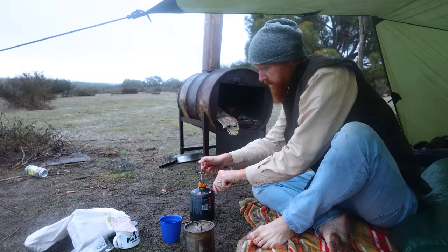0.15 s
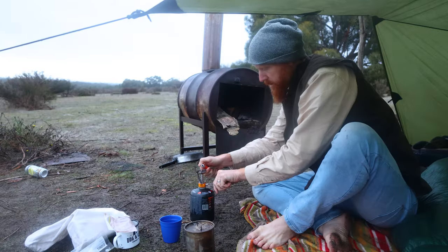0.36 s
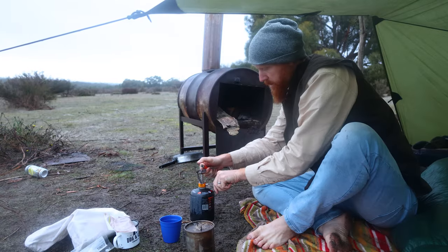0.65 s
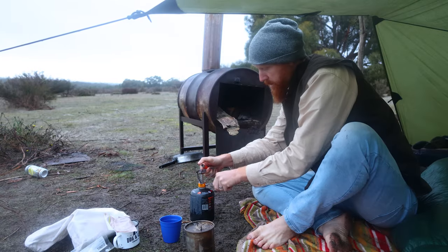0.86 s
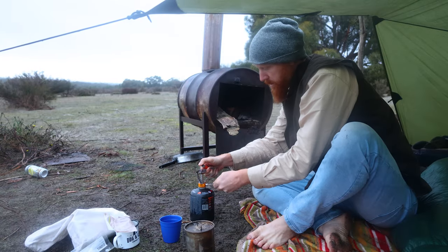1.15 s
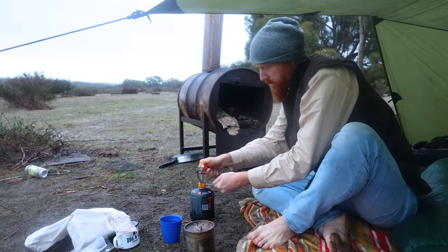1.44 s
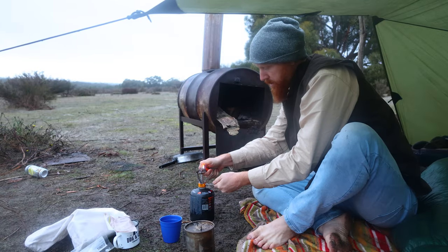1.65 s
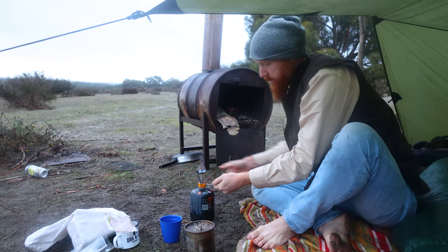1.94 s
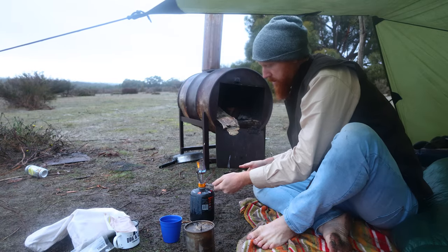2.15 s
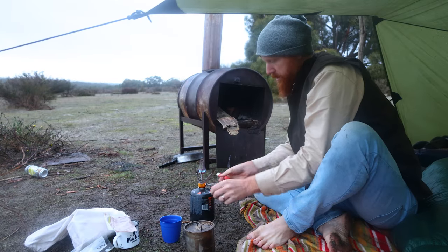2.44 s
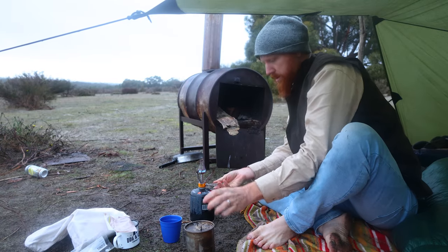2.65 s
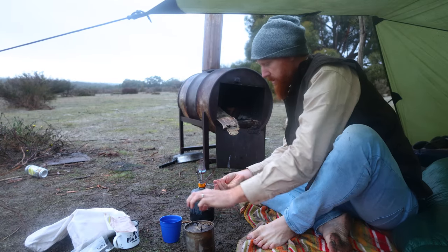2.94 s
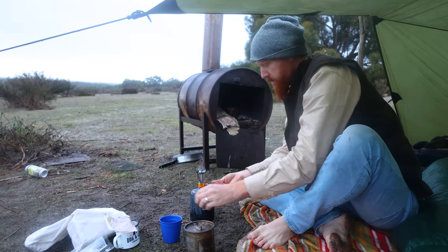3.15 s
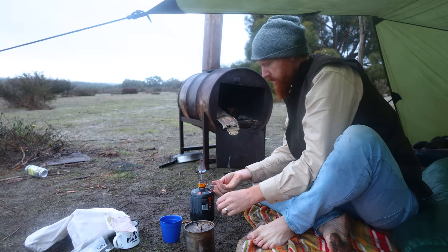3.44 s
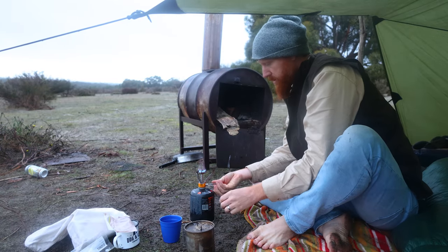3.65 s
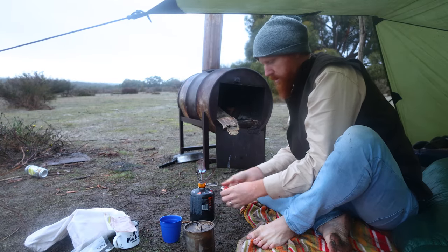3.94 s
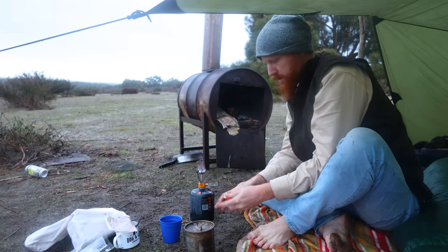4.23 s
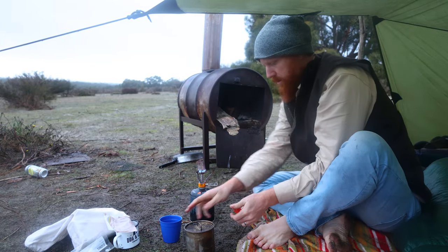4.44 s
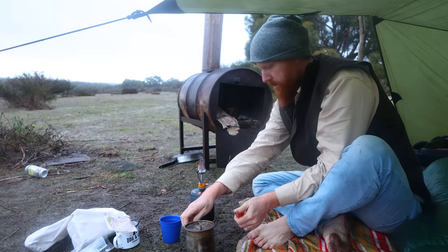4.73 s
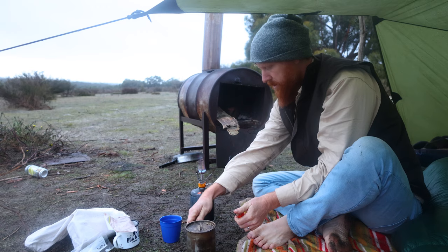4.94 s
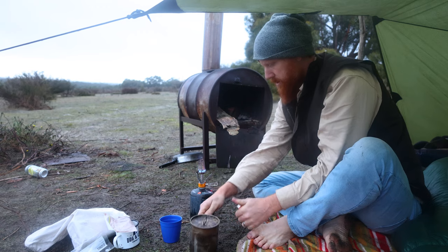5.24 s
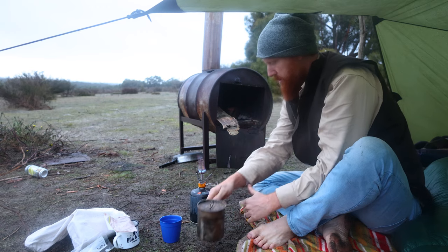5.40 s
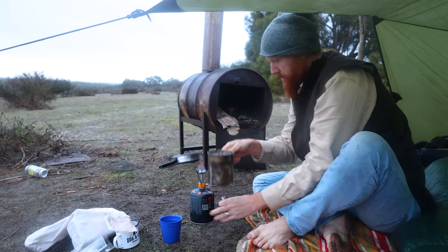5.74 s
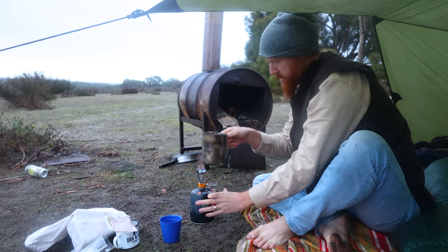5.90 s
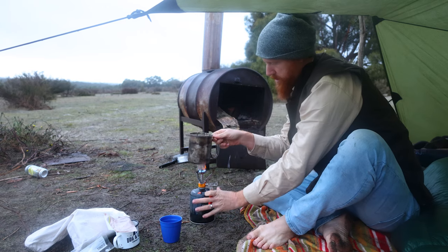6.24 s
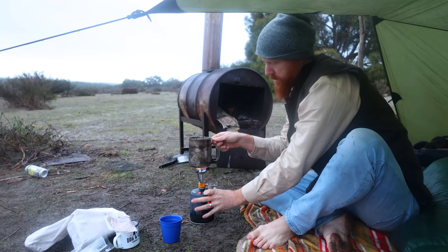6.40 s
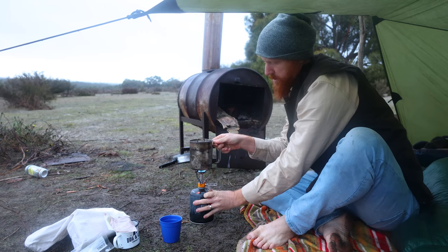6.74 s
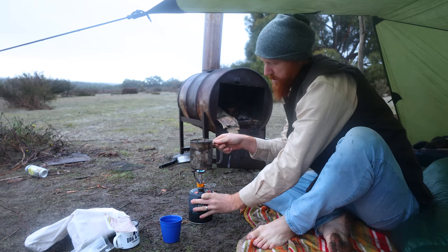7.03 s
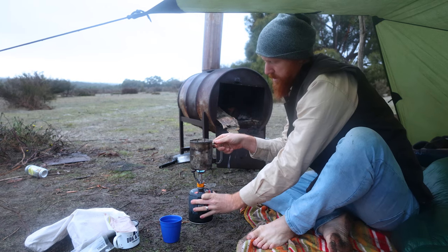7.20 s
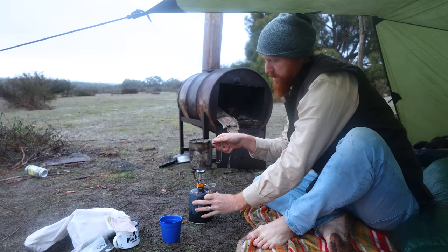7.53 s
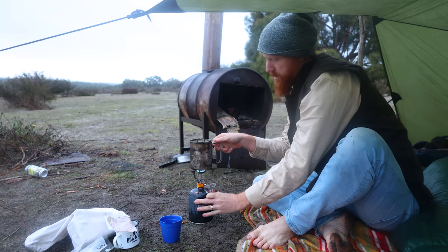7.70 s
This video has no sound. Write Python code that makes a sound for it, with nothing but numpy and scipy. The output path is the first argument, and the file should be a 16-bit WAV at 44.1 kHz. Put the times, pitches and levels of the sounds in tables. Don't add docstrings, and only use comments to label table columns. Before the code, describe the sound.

Close outdoor sound of lighting a camping stove: two gritty flint clicks, a faint gas puff, a dull whump, then continuous burner roar and jet hiss, stronger after a few seconds. Later a thin metal pot and lid tick, clank and drag on the prongs. Small birds chirp near and far over soft open air, and low wind thuds hit the microphone near the start and end. Nearly mono, dry, with faint hiss.

```python
import sys
import numpy as np
from scipy import signal
from scipy.fft import rfft, irfft
from scipy.io import wavfile
from scipy.ndimage import uniform_filter1d

SR = 44100
rng = np.random.default_rng(int(sys.argv[2]) if len(sys.argv) > 2 else 0)


def ratio_of_db(decibels):
    return 10 ** (np.asarray(decibels, float) / 20)


def master(y):
    cut = np.clip(np.atleast_2d(y).T, -1, 1)
    pcm = np.round(cut * 32767)
    wavfile.write(sys.argv[1], SR, pcm.astype(np.int16))


N = 346626
T = np.arange(N) / SR
HZ = np.fft.rfftfreq(N, 1 / SR)

# (frequency [Hz], level [dB per Hz])
ROAR_COLOUR = [(24, -26), (40, -21), (64, -6), (141, -3.5), (172, -0.5), (230, -0.5), (281, -5),
               (366, -4.5), (523, -10), (622, -17.5), (691, -12), (854, -20), (950, -31.5), (1240, -69),
               (2090, -120)]
# (frequency [Hz], level [dB per Hz])
JET_COLOUR = [(500, -29), (850, -10.5), (1010, 1), (1440, 2), (1800, -3), (2170, -14), (2440, -11),
              (2740, -8), (3270, -9.5), (4290, -16), (4710, -13.5), (5550, -19.5), (9400, -25),
              (10900, -35), (14000, -28)]
# (time [s], opening [0 = low flame, 1 = high flame])
VALVE = [(1.83, -0.16), (1.98, -0.017), (2.64, 0.049), (2.85, 0.11), (3.05, -0.24), (3.3, -0.15),
         (3.51, 0.12), (3.63, 0.78), (3.8, 1), (5.3, 0.97), (5.69, 0.93), (6.0, 0.99), (7.4, 0.87),
         (7.86, 0.98)]
# (low flame [dB], gain of the open valve [dB], change under the pot [dB])
BURNER = [
    (-42, 3, 3),
    (-57.5, 11, -3.5),
    (-58.5, 7, -3),
]
# (frequency [Hz], width [Hz], level [dB])
NOZZLE_TONES = [(4590, 180, -13.5), (9000, 500, -18.5)]
POT_COMES_S, POT_OVER_S = 5.8, 6.9
IGNITE_S, IGNITE_DB, IGNITE_WIDTH_S = 1.8195, -14, 0.0011

# (time of peak [s], level [dB], rise [s], fall [s], treble factor [1 = even])
FLINT = [(.384, -29, .005, .004, 1.6), (.367, -40, .002, .012, 1.1), (.398, -38, .0003, .0005, 3),
         (.394, -38, .0003, .0005, 2.5), (1.4585, -29, .0015, .0015, 3), (1.453, -32, .002, .002, 1),
         (1.4435, -38, .001, .004, .1), (1.438, -44, .001, .002, .1), (1.44, -50, .03, .02, .15),
         (1.4635, -32, .001, .003, 1.1), (1.4745, -38, .0005, .002, .6), (1.497, -46, .0004, .001, 2),
         (1.533, -48, .0003, .0008, 1.8), (1.5405, -54, .001, .001, 1.5), (1.5425, -44, .0003, .001, 1.8)]
# (frequency [Hz], width [Hz], level [dB])
LIGHTER_CASE = [(3350, 790, 8), (1510, 690, -8), (6000, 1700, -2.5), (8700, 4500, -4), (12700, 6300, -5.5)]
# (frequency [Hz], level [dB], width [s])
SNAP = [(3250, -10.5, .001), (9150, -11, 0.0007), (6100, -16, 0.0004), (4400, -20, .0006),
        (7600, -19, .0005), (14500, -17, .0004)]
SNAP_S = 1.4587
# (time of peak [s], level [dB], rise [s], fall [s])
PUFFS = [
    (1.2, -51, .015, .03),
    (1.24, -51, .025, .03),
    (2.74, -62, .02, .03),
    (1.96, -60, .01, .01),
]

# (time [s], peak level [dB], treble minus peak [dB], ring frequency [Hz], time to fall 60 dB [s])
TICKS = [(0.2005, -47, -14, 3500, .025), (0.2124, -44, -14, 3300, .015), (0.2327, -47, -26, 3500, .04),
         (0.7094, -45, -12, 4900, .02), (0.737, -39.5, -27, 3400, 0.022), (2.2497, -52.5, 5.5, 4580, .02),
         (4.3902, -30, -22, 4500, .022), (4.3904, -32.5, -32, 2300, .025),
         (4.7728, -28.5, -6.5, 3050, 0.066), (4.9297, -27, -1.5, 2900, 0.053),
         (5.887, -30, -9.5, 3470, 0.028), (6.39, -51, 4, 4590, .02), (6.501, -36, -24, 2400, .015),
         (6.6693, -34, -2, 5600, 0.04), (6.797, -50, 1, 3040, .02), (6.9321, -42, 0, 4240, 0.038),
         (6.982, -40, -3, 3140, .025), (6.995, -35.5, -6, 3020, 0.05), (7.1935, -44, -3.5, 5540, .02),
         (7.5358, -46, -14, 2300, .02), (7.635, -44, -20, 2800, 0.074), (7.7478, -39.5, -21, 2230, .025),
         (7.852, -41, -19, 2200, .025)]
# (frequency [Hz], level [dB], time to fall 60 dB [s])
TIN = [(2170, -8, 0.15), (3050, 0, 0.08), (5100, -0.5, 0.12), (6010, 3, 0.1), (7510, 2.5, 0.12),
       (9200, -1, 0.08), (10630, -4, 0.078), (11500, -3.5, 0.055), (13200, 0, .05)]
RATTLE_FADE_BEND = 1.32
# (time of peak [s], level [dB], rise [s], fall [s])
SCRAPE = [
    (6.93, -54, .015, .012),
    (6.99, -48, 0.022, 0.029),
]
# (time [s], frequency [Hz], level [dB],
# time to fall 60 dB [s])
KNOCKS = [(.397, 143.6, -32, 0.011), (1.809, 189, -38, 0.12), (.68, 673.9, -49, 0.028),
          (.72, 510, -51, .04), (6.975, 780, -34, .04), (4.937, 410, -26.5, 0.061), (4.94, 2240, -42, 0.19),
          (6.67, 990, -38, 0.033), (6.935, 950, -35, 0.044), (6.985, 1045, -37, .05),
          (6.997, 1055, -33, 0.087)]

# (time of peak [s], level [dB], rise [s], fall [s])
GUSTS = [(1.9, -50, .02, .03), (2.73, -60, .5, .12), (3.66, -62, .07, .3), (4.39, -63, .1, 1),
         (5.1, -54, .15, .3), (5.77, -47, 0.27, .08), (5.99, -40.5, 0.083, 0.17), (6.7, -30, .07, 0.072),
         (6.99, -34.5, .2, .45), (7.86, -42, 0.16, 0.11)]
# (time of peak [s], level [dB], rise [s], fall [s])
OPENING_GUST = (0.2, -34.5, 0.8, .08)
# (frequency [Hz], level [dB per Hz])
LEAF_COLOUR = [(71, -45), (120, -12), (245, -15.5), (510, -2), (728, -10), (1230, -9), (1440, -14),
               (1680, -8), (5500, -17.5), (9100, -53), (15400, -120)]
LEAF_DB = -52.5

# (time [s], frequency [Hz], level [dB])
SONGS = [
    [(3.416, 5600, -58), (3.43, 5500, -61), (3.46, 5820, -54), (3.5, 4570, -47), (3.508, 4505, -48),
     (3.52, 4750, -53), (3.542, 4650, -61)],
    [(3.87, 4100, -57), (3.9, 3730, -52), (3.925, 3360, -51), (3.97, 3050, -51), (3.985, 3150, -60)],
    [(4.21, 3800, -58), (4.245, 3450, -52), (4.28, 3340, -50), (4.3, 3090, -54), (4.315, 3080, -56)],
    [(4.315, 3420, -60), (4.345, 3230, -61), (4.4, 3350, -60), (4.435, 3700, -62)],
    [(4.864, 5400, -53), (4.878, 5250, -53), (4.9, 5100, -41), (4.915, 5100, -50), (4.924, 5030, -45)],
    [(5.378, 3700, -59), (5.395, 3850, -57), (5.44, 3750, -61), (5.49, 3540, -55)],
    [(5.757, 5700, -58), (5.775, 5500, -59), (5.8, 5490, -54), (5.83, 4780, -55), (5.865, 4650, -60)],
    [(6.464, 3870, -58), (6.472, 4700, -52), (6.49, 4030, -46.5), (6.51, 3810, -48), (6.537, 3730, -56)],
    [(7.195, 5600, -56), (7.21, 5560, -55), (7.232, 5400, -57), (7.25, 4950, -57), (7.285, 4800, -61)],
    [(7.63, 3140, -59), (7.68, 3400, -59), (7.73, 3610, -62), (7.81, 4050, -60)],
    [(7.81, 4600, -53), (7.828, 4080, -49), (7.86, 3780, -46)],
]
# (time [s], length [s], from [Hz], to [Hz], level [dB])
FALLS = [(.81, .025, 6300, 4750, -72), (1.985, .04, 3450, 3050, -54), (2.05, .025, 3865, 3080, -55),
         (2.07, .03, 3150, 2650, -56), (2.12, .115, 2950, 2740, -54.5), (2.15, .045, 4150, 3550, -60),
         (2.436, .04, 3750, 3400, -55), (2.97, .025, 3600, 2900, -59), (3.075, .03, 3900, 3000, -60),
         (2.415, .02, 3500, 2600, -60), (7.23, .015, 4050, 3700, -56), (5.248, .02, 2420, 2300, -51),
         (7.8, .03, 3200, 2700, -56), (7.42, .025, 3500, 3100, -57), (7.355, .03, 3400, 2700, -54)]
# (time [s], length [s], from [Hz], to [Hz], level [dB])
RISES = [(.45, .05, 2440, 2600, -65), (.68, .055, 4800, 4900, -61), (2.06, .1, 4900, 5500, -70),
         (2.4, .043, 2450, 2590, -53), (2.478, .04, 3550, 3990, -59), (3.05, .04, 2650, 3050, -59),
         (3.19, .035, 3300, 4050, -60), (3.23, .035, 3300, 3650, -57), (3.32, .04, 3500, 4200, -62),
         (3.33, .07, 3150, 3700, -61), (3.54, .16, 3350, 4100, -59), (3.84, .05, 2377, 2523, -57),
         (5.315, .03, 2460, 2560, -50), (7.445, .035, 2820, 3300, -52), (7.325, .03, 3380, 3520, -56)]
# (time [s], length [s], from [Hz], to [Hz], level [dB])
DIVES = [
    (5.805, .065, 4000, 3600, -60),
    (6.415, 0.038, 5300, 5080, -52),
]
# (time [s], length [s], frequency [Hz], level [dB])
PIPS = [(.27, .07, 2430, -64), (.33, .035, 2965, -60), (.49, .04, 4010, -67), (.89, .05, 4870, -66),
        (1.9, .02, 2295, -60), (1.94, .045, 3340, -55), (1.97, .03, 2340, -57), (2.075, .03, 3330, -57),
        (2.08, .07, 4140, -59), (2.325, .025, 3580, -57), (2.34, .025, 2343, -53), (2.59, .02, 3400, -59),
        (2.685, .015, 3050, -59), (2.81, .035, 3340, -59), (3.11, .04, 3460, -57), (3.74, .04, 6660, -68),
        (3.37, .035, 3580, -60), (2.27, .025, 3100, -60), (2.55, .04, 2400, -59), (5.222, .02, 2980, -55)]
# (start [s], time of top [s], end [s], top frequency [Hz], level [dB])
ARCHES = [
    (.755, .79, .815, 6600, -65),
    (.955, .985, 1.02, 6804, -71),
    (.975, 1.022, 1.062, 7450, -57),
    (3.2, 3.23, 3.265, 6654, -62),
]
SLUR_BEND, DIVE_BEND = 1.1, 2.3
ARCH_SAG_HZ_PER_S2, ARCH_FALL_STEEPER = 7.5e5, 2.2
NOTE_PEAK_AT, DIVE_PEAK_AT, ARCH_PEAK_AT = .5, .6, .85
NOTE_ENDS_DB = -6
WAVER_HZ, WAVERS_PER_S, FLUTTER_DB = 40, 300, 1.8
GROUND_ECHO_S, GROUND_ECHO_DB = .012, -9
# (time [s], level [dB])
CHORUS = [(1.8, -78), (2.05, -62), (2.6, -65), (3.1, -70), (3.6, -67), (7.2, -67), (7.4, -62)]

# (frequency [Hz], level [dB per Hz])
AIR_COLOUR = [(12, -38), (20, -6), (95, 3.5), (137, 0), (2050, -10), (3890, -13), (4600, -9), (5750, -14),
              (15700, -20)]
AIR_DB = -56.5
# (frequency [Hz], level [dB per Hz])
SELF_NOISE_COLOUR = [(18, -33), (30, -3.5), (412, -6.5), (857, -7), (4470, -7.5), (14500, -7),
                     (15700, -10.5)]
SELF_NOISE_DB, TOP_HZ = -58, 15870


def unit(x):
    return x / np.sqrt(np.mean(x ** 2))


def noise():
    return rng.standard_normal(N)


def colour(x, points):
    hz, db = np.transpose(points)
    gain = ratio_of_db(np.interp(np.log(HZ + 1), np.log(hz), db))
    return unit(irfft(rfft(x) * gain, N))


def band(x, lo_hz, hi_hz, order=2):
    return signal.sosfilt(signal.butter(order, [lo_hz, hi_hz], "band", fs=SR, output="sos"), x)


def ring(x, hz, width):
    return signal.lfilter(*signal.iirpeak(hz, hz / width, SR), x)


def walk(rate):
    k = int(SR / rate)
    steps = np.repeat(rng.standard_normal(N // k + 1), k)
    return 0.857 * uniform_filter1d(uniform_filter1d(steps, k), k)[:N]


def swell(rows):
    total = 0
    for s, db, rise, fall in rows:
        total = total + ratio_of_db(db) * np.exp(np.where(T < s, (T - s) / abs(rise), (s - T) / abs(fall)))
    return total


def bump(s, width):
    return np.exp(-((T - s) / width) ** 2)


def flame():
    valve = np.interp(T, *np.transpose(VALVE))
    cover = np.interp(T, [POT_COMES_S, POT_OVER_S], [0, 1])
    roar_db, jet_db, nozzle_db = (low_db + open_db * valve + pot_db * cover
                                  for low_db, open_db, pot_db in BURNER)
    lit = np.clip((T - IGNITE_S + 0.017) / 0.012, 0, 1)
    flicker = walk(14)

    pops = (rng.random(N) < 4000 / SR) * ratio_of_db(2.1 * rng.exponential(size=N))
    roar = colour(pops - pops.mean(), ROAR_COLOUR)
    deep = band(roar, 45, 330) * ratio_of_db(.9 * flicker + 1.2 * walk(25))
    brighter_db = (jet_db - roar_db + 10) * 0.38
    upper = (roar - band(roar, 24, 332)) * ratio_of_db(1.2 * flicker + 0.55 * walk(9) + brighter_db)

    eddies = rfft(colour(noise(), JET_COLOUR))
    jet = unit(irfft(eddies * (HZ < 2000), N))
    nozzle = unit(irfft(eddies * (HZ >= 2000), N))
    for hz, width, db in NOZZLE_TONES:
        nozzle = nozzle + ratio_of_db(db) * unit(ring(noise(), hz, width))
    jet = jet * ratio_of_db(jet_db + 0.66 + .5 * flicker + 0.8 * walk(30))
    nozzle = nozzle * ratio_of_db(nozzle_db - 0.6 + 1.26 * walk(25))
    return lit * ((deep + upper) * ratio_of_db(roar_db + 0.93) + jet + nozzle)


def ignition():
    push = bump(IGNITE_S, IGNITE_WIDTH_S)
    back = 0.44 * bump(IGNITE_S + .005, 0.0044) - 0.17 * bump(IGNITE_S + .014, 0.0064)
    crackle = swell([(IGNITE_S + 0.00087, -44, .002, .004)]) * band(noise(), 630, 3100)
    return ratio_of_db(IGNITE_DB) * (push - back) + 3 * crackle


def lighter():
    grit = noise() * ratio_of_db(walk(770))
    case = [ratio_of_db(db) * ring(ring(grit, hz, width), hz, 2 * width) for hz, width, db in LIGHTER_CASE]
    low = case[0] * swell([row[:4] for row in FLINT])
    high = sum(case[1:]) * sum(row[4] * swell([row[:4]]) for row in FLINT)
    scraping = (low + high) / np.std(sum(case))

    snap = 0
    for hz, db, width in SNAP:
        snap = snap + ratio_of_db(db) * bump(SNAP_S, width) * np.cos(2 * np.pi * hz * (T - SNAP_S))
    gas = unit(band(noise(), 3100, 5900, order=4) + 0.43 * band(noise(), 900, 8900))
    return scraping - snap + gas * swell(PUFFS)


def ticks():
    size = 8192
    out, t = np.zeros(N + size), np.arange(size) / SR
    for s, db, treble_db, hz, t60 in TICKS:
        ragged = ratio_of_db(1.5 * np.repeat(rng.standard_normal(128), 64))
        crack = rng.standard_normal((2, size)) * ragged
        fade = ratio_of_db(-60 * (t / abs(t60)) ** RATTLE_FADE_BEND) * np.clip(t / 0.00039, 0, 1)
        body = unit(band(crack[0], 1700, 5300)) + 0.97 * unit(ring(crack[0], hz, 250))
        treble = fade ** .4 * ratio_of_db(treble_db + 6.5) * unit(band(crack[1], 3700, 16300))
        wall = 0
        for k, (mode_hz, mode_db, mode_t60) in enumerate(TIN):
            mode_level = ratio_of_db(mode_db + 1.5 * crack[0, k] - 60 * t / min(mode_t60, 1.5 * abs(t60)))
            wall = wall + mode_level * np.sin(2 * np.pi * mode_hz * t + crack[1, k])
        i = int(s * SR)
        out[i:i + size] += ratio_of_db(db - 9) * (fade * (body + treble) + ratio_of_db(treble_db - 6) * wall)
    return out[:N]


def scrape():
    grains = (rng.random(N) < 4000 / SR) * ratio_of_db(1.2 * rng.exponential(size=N)) * noise()
    tin = band(grains, 700, 15000, order=1) + 1.5 * ring(grains, 2970, 700) + 1.8 * ring(grains, 5100, 600)
    return unit(tin) * swell(SCRAPE)


def knock(s, hz, db, t60):
    t = np.maximum(T - s, 0)
    return ratio_of_db(db - 60 * t / t60) * np.sin(2 * np.pi * hz * t) * np.clip(t / 0.00031, 0, 1)


def wind():
    buffet = band(noise(), 25.8, 40.5, order=3)
    buffet = buffet / (0.36 + uniform_filter1d(np.abs(unit(buffet)), 3000))
    opening = np.clip((.176 - T) / 0.0033, 0, 1)
    swing = np.sqrt(2) * np.cos(2 * np.pi * 26.3 * (T - .031)) * swell([OPENING_GUST])
    growing_db = 44 * np.minimum(T, .2)
    leaves = colour(noise(), LEAF_COLOUR) * ratio_of_db(LEAF_DB + growing_db + 0.5 * walk(41))
    return unit(buffet) * swell(GUSTS) + opening * (swing + leaves)


def song(rows, waver):
    s, hz, db = np.transpose(rows)
    edge = np.clip(np.minimum(T - s[0], s[-1] - T) / 0.0051, 0, 1)
    pitch = uniform_filter1d(np.interp(T, s, hz), size=200) + waver
    return np.sqrt(2) * edge * ratio_of_db(np.interp(T, s, db)) * np.sin(2 * np.pi * np.cumsum(pitch) / SR)


def whistle(s, length, db, pitch, peak_at=NOTE_PEAK_AT):
    u = np.arange(int(length * SR)) / (length * SR)
    edge = np.clip(np.minimum(u, 1 - u) * length / 0.005, 0, 1)
    swelling_db = np.interp(u, [0, peak_at, 1], [NOTE_ENDS_DB, 0, NOTE_ENDS_DB])
    tone = np.sin(2 * np.pi * np.cumsum(pitch(u)) / SR)
    return int(s * SR), np.sqrt(2) * edge * ratio_of_db(db + swelling_db) * tone


def slide(start_hz, end_hz, bend):
    return lambda u: end_hz + (start_hz - end_hz) * (1 - u) ** bend


def arch(s, top, end, hz):
    def pitch(u):
        t = s + u * (end - s) - top
        return hz - ARCH_SAG_HZ_PER_S2 * t ** 2 * np.where(t > 0, ARCH_FALL_STEEPER, 1)
    return pitch


def trees(x, t60, db):
    echoes = rng.standard_normal(8000) * ratio_of_db(db - 60 * T[:8000] / t60)
    return signal.fftconvolve(x, echoes)[:N]


def birds():
    notes = [whistle(s, n, db, slide(a, b, SLUR_BEND)) for s, n, a, b, db in FALLS + RISES]
    notes += [whistle(s, n, db, slide(a, b, DIVE_BEND), DIVE_PEAK_AT) for s, n, a, b, db in DIVES]
    notes += [whistle(s, n, db, slide(hz, hz, 1)) for s, n, hz, db in PIPS]
    notes += [whistle(s, end - s, db, arch(s, top, end, hz), ARCH_PEAK_AT) for s, top, end, hz, db in ARCHES]
    calls = np.zeros(2 * N)
    for i, note in notes:
        calls[i:i + len(note)] += note
    waver = WAVER_HZ * walk(WAVERS_PER_S)
    songs = sum(song(rows, waver) for rows in SONGS)
    direct = (calls[:N] + songs) * ratio_of_db(FLUTTER_DB * walk(150))
    ground = ratio_of_db(GROUND_ECHO_DB) * np.pad(direct, (int(GROUND_ECHO_S * SR), 0))[:N]
    return direct + ground + trees(direct, .17, -30)


def chorus():
    size = 4096
    out, t = np.zeros(N + size), np.arange(size) / SR
    for when, long, high, slope, loud in rng.random((450, 5)):
        i = int(when * N)
        length = 0.0135 + 0.0607 * long ** 2
        hz = 2200 * 2.1 ** high * (1 + 0.409 * (slope - .5) * t / length)
        shape = np.sin(np.pi * np.clip(t / length, 0, 1))
        out[i:i + size] += ratio_of_db(9 * loud) * shape * np.sin(2 * np.pi * np.cumsum(hz) / SR)
    out = out[:N] + trees(out[:N], .2, -27)
    return unit(out) * ratio_of_db(np.interp(T, *np.transpose(CHORUS)))


def open_air():
    return colour(noise(), AIR_COLOUR) * ratio_of_db(AIR_DB - 2.5 + .5 * walk(3.66))


def scene():
    stove = flame() + ignition() + lighter()
    pot = ticks() + scrape() + sum(knock(*row) for row in KNOCKS)
    field = wind() + birds() + chorus() + open_air()
    return np.tile(stove + pot + field, (2, 1))


def band_limit(x):
    return signal.sosfilt(signal.butter(12, 16660, fs=SR, output="sos"), x)


def record(dry):
    hiss = [colour(noise(), SELF_NOISE_COLOUR) * ratio_of_db(SELF_NOISE_DB) for _ in dry]
    mix = irfft(rfft(dry + hiss) * (HZ < TOP_HZ), N)
    return band_limit(mix)


dry = scene()
out = record(dry)
master(out)
```